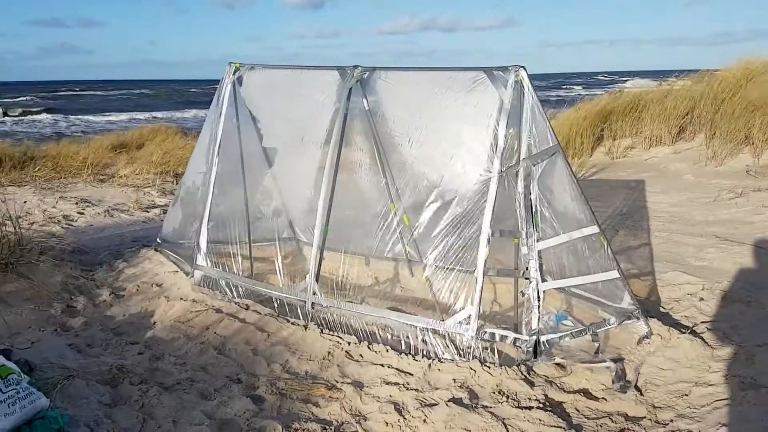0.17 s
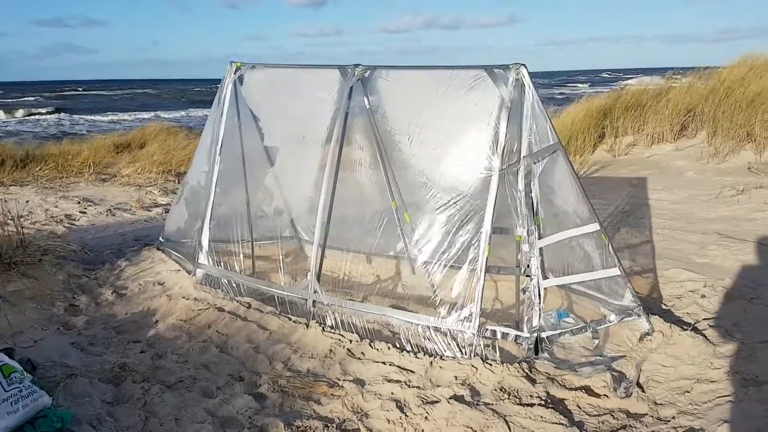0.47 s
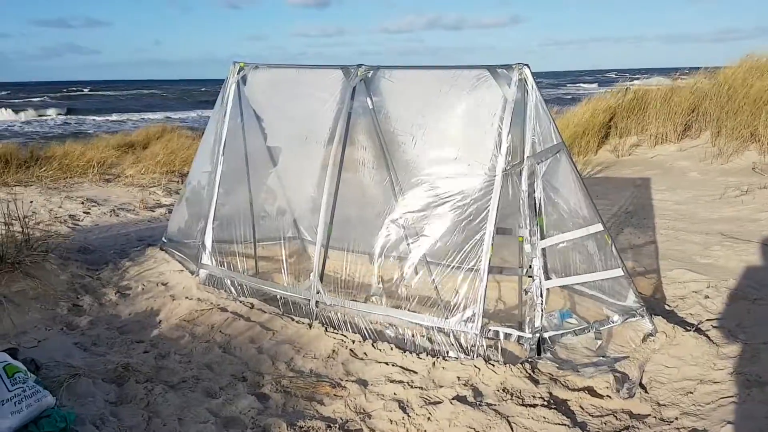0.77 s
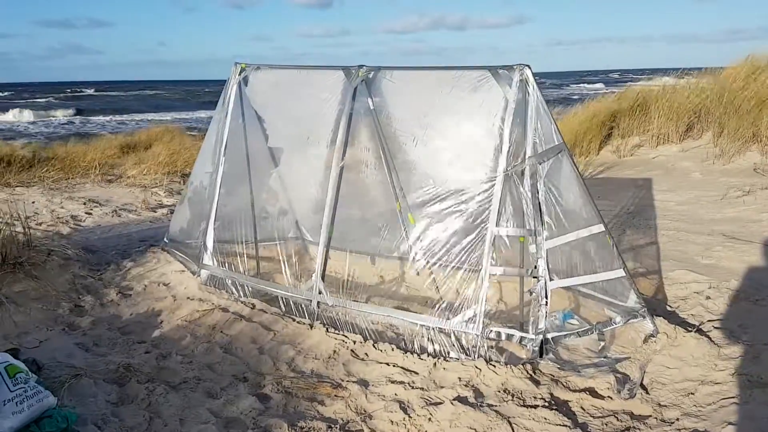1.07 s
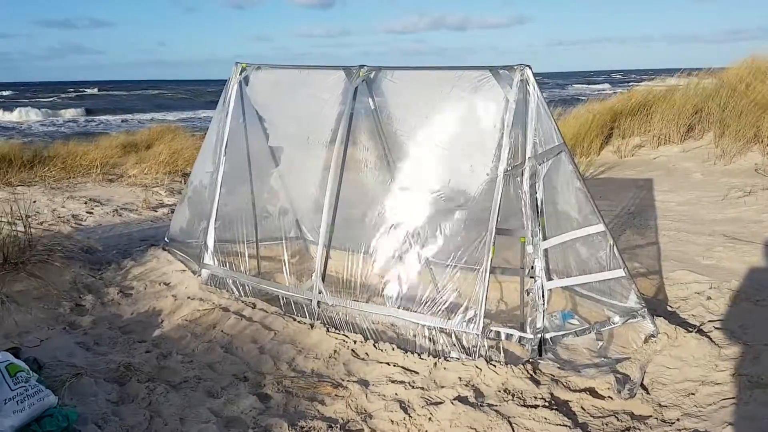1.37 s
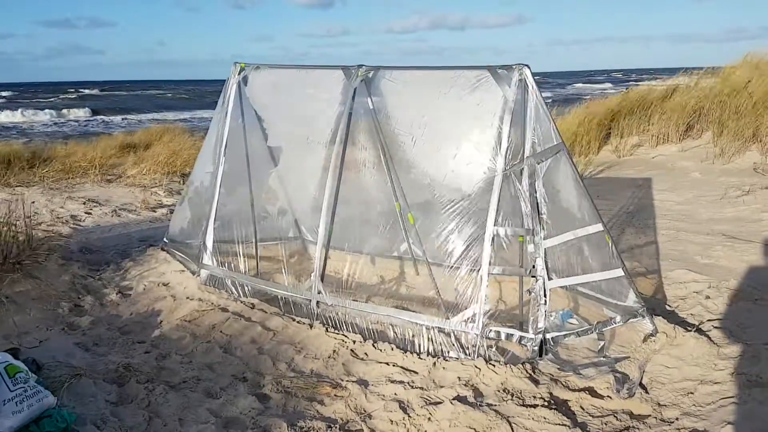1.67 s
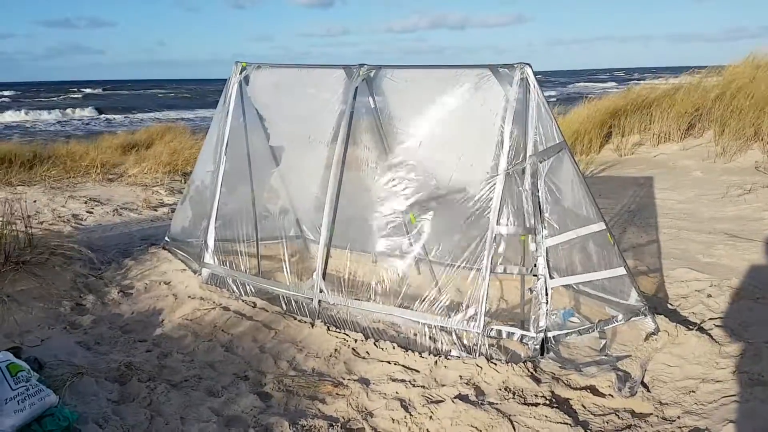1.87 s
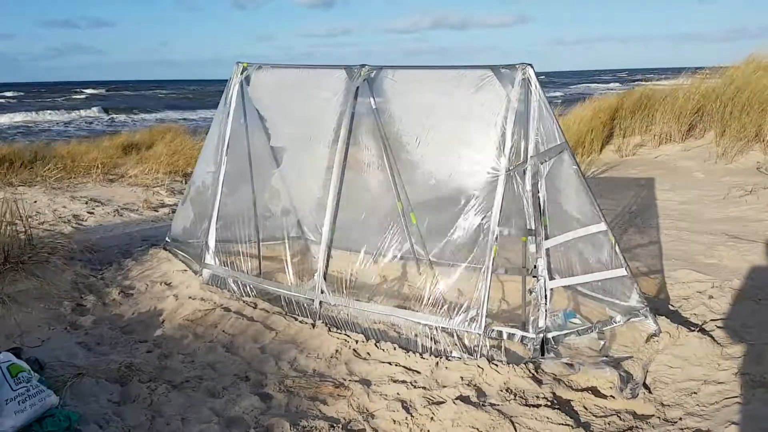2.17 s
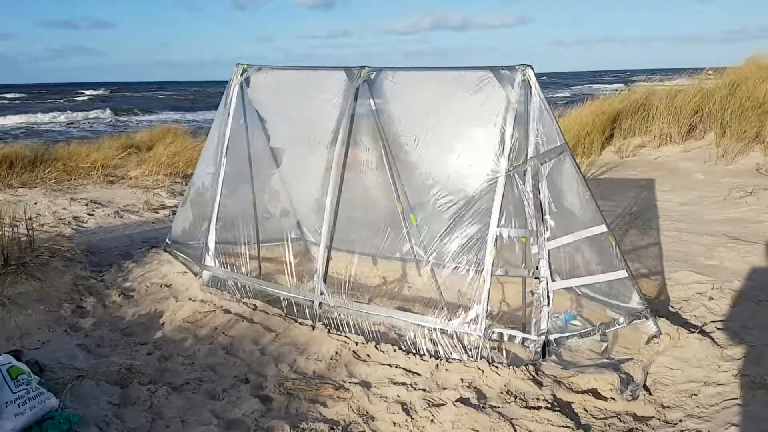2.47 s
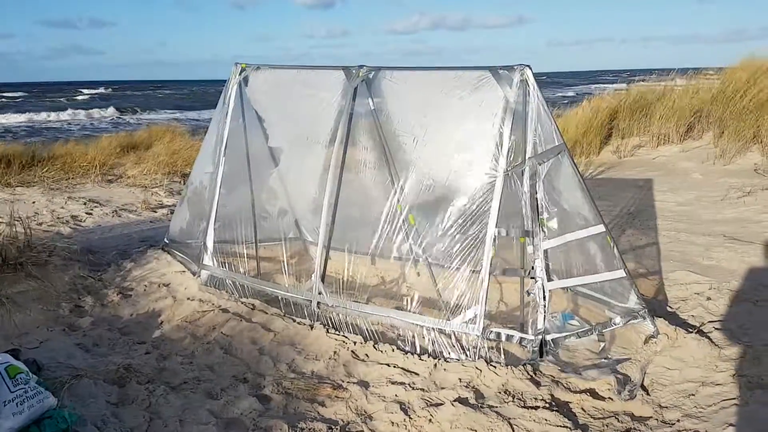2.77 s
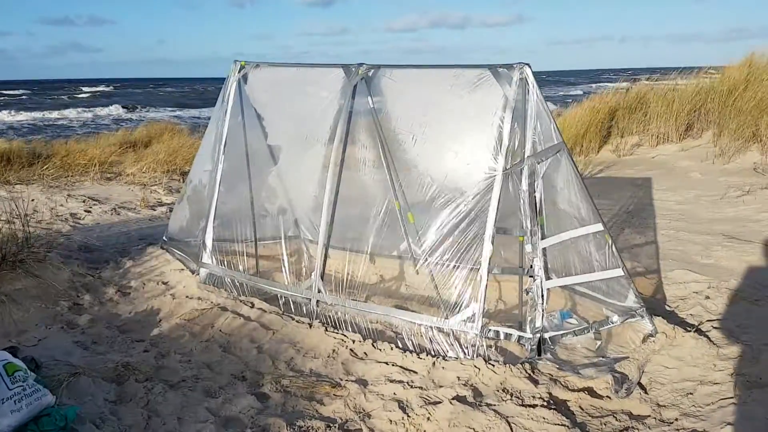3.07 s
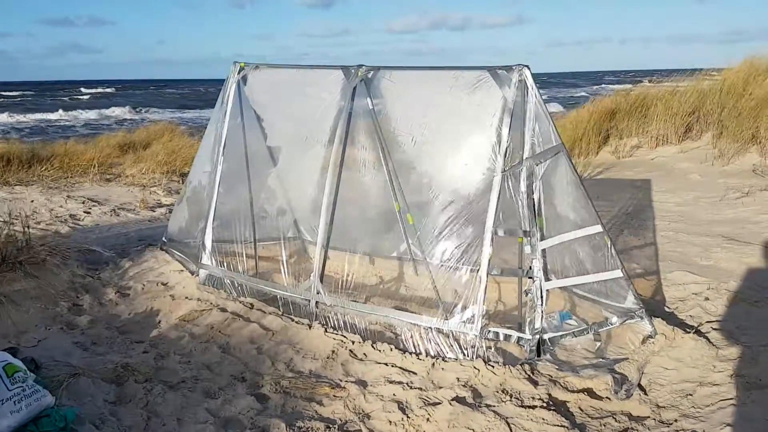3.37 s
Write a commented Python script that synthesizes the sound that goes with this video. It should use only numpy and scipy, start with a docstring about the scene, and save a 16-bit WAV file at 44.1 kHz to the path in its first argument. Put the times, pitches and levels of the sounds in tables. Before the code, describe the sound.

Plastic sheet snaps and crackles in gusty beach wind, with low buffeting and distant surf hiss

```python
"""Plastic sheet flapping on a windy beach

A plastic sheet on a frame snaps and crackles in the wind, with surf far off to the left.
Surf is shaped hiss that reaches the left port first; wind is filtered random impulses, separate at
the two microphone ports, with short noise bursts for hard buffets. The sheet's snaps are noise bursts
of milliseconds, and its crackle is noise gated by many random creases.
"""
import sys
import numpy as np
from scipy import signal
from scipy.fft import rfft, irfft
from scipy.io import wavfile
from scipy.ndimage import uniform_filter1d

SR = 44100
rng = np.random.default_rng(int(sys.argv[2]) if len(sys.argv) > 2 else 0)


def to_wav(s):
    """Save 16-bit WAV."""
    ch = np.atleast_2d(s).T  # columns
    pcm = np.round(np.clip(ch, -1, 1) * 32767)  # PCM
    wavfile.write(sys.argv[1], SR, pcm.astype(np.int16))


N = 154791  # length in samples

# Sound spectrum of the sheet. Each row: frequency in hertz, relative level in dB.
SHEET = [(200, -9), (600, 8.5), (1000, 5), (2000, 3.5), (3500, -4.5), (5800, -6.5), (7500, -14.5),
         (9000, -29.5), (12000, -26.5), (15500, -33.5)]
SHEET_PIVOT_HZ = 5200  # spectral tilts of the sheet turn about this frequency


def amp(db):
    """Decibel law: converts a level in dB to an amplitude ratio."""
    return 10 ** (np.asarray(db) / 20)


def evened(x):
    """Normalization: scales a signal to unit root-mean-square value."""
    return x / np.sqrt(np.mean(x ** 2) + 1e-20)


def read(points, hz):
    """Logarithmic frequency scale: interpolates a spectrum table along log frequency."""
    f, value = np.transpose(points)
    return np.interp(np.log(hz + 1), np.log(f + 1), value)


def curve(table, column):
    """Slow envelope: interpolates one column linearly in time, at every sample."""
    rows = np.array(table)
    return np.interp(np.arange(N) / SR, rows[:, 0], rows[:, column])


def colour(x, points, tilt_db=0., pivot_hz=SHEET_PIVOT_HZ):
    """Linear filtering by a spectrum table, tilted in dB per octave from an octave below the pivot upward."""
    hz = np.fft.rfftfreq(x.shape[-1], 1 / SR)
    octaves = np.log2(np.maximum(hz / pivot_hz, .5))
    gain = amp(read(points, hz) + tilt_db * octaves)
    return irfft(rfft(x) * gain, x.shape[-1])


def clicks(per_s, spread_db, channels=2):
    """Random point process: sparse impulses of random sign, a few of them large."""
    chance, size, sign = rng.random((3, channels, N))
    struck = chance < per_s / SR
    excess_db = spread_db * np.minimum(-np.log(size + 1e-9), 4)
    return struck * np.sign(sign - .5) * amp(excess_db)


def sides(pan_db):
    """Level difference between the ears: left and right gains, half the difference on each side."""
    return amp(np.array([pan_db / 2, -pan_db / 2]))


def bursts(rows, spectrum, pivot_hz, grain, skew, power, size):
    """Transient noise under a swelling envelope; rows of (s, dB, pan dB, length s, tilt dB per octave)."""
    vary_db = 3.5  # each burst shifts the points of its spectrum by chance
    out = np.zeros((2, N + size))
    t = np.arange(size) / SR
    noises = rng.standard_normal((len(rows), 2, size))
    for noise, (s, db, pan_db, length, tilt_db) in zip(noises, rows):
        own = [(hz, level + vary_db * chance)
               for (hz, level), chance in zip(spectrum, noise[0, ::-1])]
        # A skew under 1 gives a quick rise and a long tail
        phase = np.clip(t / max(length, 1e-3), 0, 1) ** skew
        swell = np.sin(np.pi * phase).clip(0) ** power
        spiky = noise * abs(noise) ** grain  # grain 0 leaves smooth noise
        burst = swell * colour(spiky, own, tilt_db, pivot_hz)
        # Each port gets the energy of unit noise under the same swell
        burst = burst / np.sqrt((burst ** 2).sum(1, keepdims=True) / (swell ** 2).sum())
        at = max(round(s * SR), 0)
        out[:, at:at + size] += amp(db) * sides(pan_db)[:, None] * burst
    return out[:, :N]


def surf():
    """Partial coherence and arrival delay: wide hiss in drifting patches, brighter as it swells."""
    # Each row: frequency in hertz, relative level in dB per hertz
    hiss_spectrum = [(200, -5), (500, -7), (750, 2), (1000, -4.5), (1550, -7), (1750, -4.5), (1950, -2.5),
                     (2350, -7), (3000, -9), (4300, -11.5), (5800, -20.5), (7100, -17), (8000, -24.5),
                     (9000, -38.5), (12000, -31), (15600, -35)]
    # Each row: time in seconds, level in dB before a final 3 dB lift
    level_points = [(0, -41.5), (.5, -41), (1.0, -41), (1.5, -40.5), (1.85, -40.5), (2.15, -38),
                    (2.45, -40), (2.8, -41), (3.1, -41.5), (3.51, -42)]
    # Each row: frequency in hertz, left minus right in dB
    balance_points = [(180, -12), (550, 3), (1650, -2), (4970, -7), (15000, -3)]
    # Each row: frequency in hertz, likeness of left and right from 0 to 1
    likeness_points = [(300, 0.11), (1000, 0.48), (2000, 0.74), (4000, 0.09), (8000, 0.2)]
    lead_s, patch_db = .00041, 1.37
    brighten = 0.27  # extra tilt, dB per octave for each dB of swell
    window, hop = 1024, 256  # samples
    frames, hz = N // hop + 5, np.fft.rfftfreq(window, 1 / SR)

    a, b, c, d, patches = rng.standard_normal((frames, len(hz), 5)).T
    # Smoothing over frequency, then over time, makes the patches
    patches = evened(uniform_filter1d(uniform_filter1d(patches, 14, 0), 12, 1))

    same = np.clip(read(likeness_points, hz), 0, 1)[:, None]
    left = a + 1j * b
    late = np.exp(-2j * np.pi * hz * lead_s)[:, None]
    right = same * late * left + np.sqrt(1 - same ** 2) * (c + 1j * d)
    spectra = np.array([left, right])
    spectra *= amp(read(hiss_spectrum, hz)[:, None] + patch_db * patches)
    spectra *= sides(read(balance_points, hz))[:, :, None]

    level_db = curve(level_points, column=1)
    frame_db = level_db[np.minimum(np.arange(frames) * hop, N - 1)]
    octaves = np.log2(hz / 2000 + .1)
    spectra *= amp(brighten * np.outer(octaves, frame_db - frame_db.mean()))
    hiss = signal.istft(spectra, nperseg=window, noverlap=window - hop)[1][:, :N]
    return amp(level_db) * evened(hiss) * np.sqrt(2)


def wind():
    """Turbulent pressure: eddies strike each port on their own, in lumps; sharp gusts favour small eddies."""
    # Each row: time in seconds, strength in dB before a final 3 dB lift, left minus right in dB,
    # sharpness in dB (extra level of the small eddies)
    gusts = [(0, -38, 11.5, 9.5), (.2, -30.5, 6.5, -6), (.35, -30.5, 2, -5), (.55, -28.5, -3, -0.5),
             (.75, -22.5, 5.5, -8.5), (.96, -37.5, 0.5, -3.5), (1.1, -31, 5, 3), (1.3, -30, 4.5, -3),
             (1.44, -32.5, 5.5, 2), (1.58, -30.5, 4.5, 1), (1.78, -22.5, 4.5, -5.5), (1.9, -40.5, 7.5, 5),
             (2.08, -35.5, -4.5, -1), (2.28, -31.5, 5, 4), (2.43, -39.5, 4, 4.5), (2.6, -33, -2, 2.5),
             (2.77, -30, 1, -1), (2.82, -34, -3.5, -5), (2.95, -22.5, -1.5, -11.5), (3.12, -33, 9, -5.5),
             (3.38, -30.5, 0, -2), (3.51, -42, 2, 3.5)]
    # Large eddies, then small ones. Each row: frequency in hertz, relative level in dB
    rumble = [(25, -24), (50, -4.5), (100, 2.5), (200, -2.5), (300, -5), (500, -52.5)]
    flutter = [(60, -2), (150, -4.5), (280, -5.5), (370, -1), (480, -8), (800, -16), (1500, -22.5),
               (4000, -75)]
    rumble_db, flutter_db = -4.5, -3.4
    eddies_per_s, spread_db = 1400, 1.5
    lump_db, lump_s = 2.46, 0.01

    width = round(lump_s * SR)
    drift = rng.standard_normal((2, N))
    lumps = evened(uniform_filter1d(uniform_filter1d(drift, width), width))
    lump_gain = amp(lump_db * lumps)
    big = evened(colour(clicks(eddies_per_s, spread_db) * lump_gain, rumble))
    small = evened(colour(clicks(eddies_per_s, spread_db) * lump_gain, flutter))
    mix = amp(rumble_db) * big + amp(flutter_db + curve(gusts, column=3)) * small
    strength = np.sqrt(2) * amp(curve(gusts, column=1))
    return strength * sides(curve(gusts, column=2)) * mix


def puffs():
    """Incoherent pressure bursts: hard buffets of air, unrelated between ports, strike fast and roll away."""
    # Each row: start in seconds, peak level in dB, left minus right in dB, length in seconds,
    # tilt in dB per octave
    buffets = [(.008, -35, 15.5, 0.047, 2.5), (.146, -24.5, 4.5, 0.042, -2.5), (.205, -21, 2, 0.077, -16.5),
               (.455, -22.5, 4, 0.066, -12.5), (.638, -15, 9.5, 0.031, -3.5), (.662, -20, -5, 0.071, -6),
               (.722, -27, -1, 0.13, -8.5), (1.13, -27.5, 7, 0.12, 0.5), (1.217, -26.5, 7.5, .02, 5),
               (1.235, -30.5, 4, 0.063, 1), (1.278, -22.5, 2, .03, -3.5), (1.341, -38, 13, .012, 3),
               (1.485, -17, 2, 0.067, -8), (1.55, -27, 5, 0.04, -8), (1.595, -23, 0, 0.11, -18.5),
               (1.68, -26, 2.5, 0.075, -5.5), (1.775, -30.5, 1, 0.05, -14), (2.27, -33.5, 2, 0.095, -4.5),
               (2.46, -25, 10, 0.0039, -2), (2.495, -23.5, 2.5, 0.078, -12.5),
               (2.565, -23.5, -0.5, 0.065, -9), (2.612, -19.5, -1, 0.046, -10.5),
               (2.646, -15, -1, 0.024, -8.5), (2.668, -20.5, 1, 0.046, -8.5),
               (2.71, -23.5, 4.5, 0.087, -11.5), (2.743, -15, -3, 0.021, -12.5),
               (2.938, -22.5, 6.5, 0.084, -3), (2.968, -17.5, -0.5, 0.05, -0.5),
               (3.022, -15, -4, 0.045, -6.5), (3.065, -27, 3, 0.076, -5), (3.135, -29.5, 4, 0.055, -3),
               (3.18, -20.5, 0, 0.055, -6.5), (3.245, -26.5, 2, 0.038, -5), (3.385, -24.5, 6, 0.06, -8.5)]
    # Each row: frequency in hertz, relative level in dB
    buffet_spectrum = [(30, -24), (70, -11), (130, -6.5), (250, -3), (370, 5), (550, -1), (1000, -10),
                       (2000, -18.5), (4000, -42), (8000, -62)]
    return bursts(buffets, buffet_spectrum, pivot_hz=366, grain=.55, skew=.6, power=.9, size=8192)


def crackle():
    """Superposed random impulses: many small creases, dull and bright, fold and let go in the sheet."""
    # Each row: time in seconds, rustle level in dB
    rustle = [(0, -40), (.18, -44), (.3, -43), (.45, -49), (.6, -35), (.75, -43), (.95, -40), (1.2, -47),
              (1.33, -65), (1.45, -29), (1.54, -55), (1.72, -38.5), (1.85, -58), (2.0, -42), (2.15, -47),
              (2.28, -42), (2.45, -47), (2.62, -50), (2.78, -47), (2.97, -37), (3.15, -64), (3.51, -42)]
    creases_per_s, spread_db, pan_db = 370, 3.5, -1.5
    crease_s = 0.00083  # time constant of the rise and of the fall
    tilts_db = (-3.5, 3)  # per octave: dull and bright creases

    t = np.arange(-400, 400) / SR
    crease = np.exp(-abs(t) / crease_s)[None]
    # One train of creases for each tilt
    trains = abs(clicks(creases_per_s, spread_db, channels=len(tilts_db)))
    folds = signal.oaconvolve(trains, crease, "same")
    noise = np.zeros((2, N))
    for fold, tilt_db in zip(folds, tilts_db):
        noise += evened(colour(fold * rng.standard_normal((2, N)), SHEET, tilt_db))
    return amp(curve(rustle, column=1)) * sides(pan_db)[:, None] * evened(noise)


def snaps():
    """Impulsive radiation: each snap is milliseconds of noise in the colour of the sheet."""
    # Each row: start in seconds, peak level in dB, tilt in dB per octave, length in seconds
    snap_rows = [(0.246, -43, 22, 0.0045), (0.36, -36, 10, 0.0035), (0.373, -33.5, 7, 0.008),
                 (0.425, -31, 3, 0.0046), (0.4615, -30.5, 9.5, 0.012), (0.477, -37, 13, 0.006),
                 (0.489, -32.5, 10, 0.0042), (0.5, -33, 8, 0.012), (0.511, -36, 7, 0.0096),
                 (0.5417, -24.5, -2, 0.0042), (0.5484, -23, 4, 0.0034), (0.602, -34.5, 4, 0.0065),
                 (0.612, -28, 7, 0.0027), (0.629, -37, -30, 0.0045), (0.6878, -22, 6, 0.0053),
                 (0.8836, -26, -0.5, 0.0041), (1.211, -25, 4, 0.0025), (1.255, -31, 9, 0.0032),
                 (1.372, -27, 6, 0.0037), (1.43, -37, 3, 0.011), (1.438, -25, 2, 0.006),
                 (1.442, -25.5, 7, 0.01), (1.4481, -22.5, 2, 0.0086), (1.458, -24.5, 3.5, 0.009),
                 (1.469, -23, 2, 0.0061), (1.489, -27, 3, 0.0043), (1.537, -22, -4, 0.0015),
                 (1.6841, -29, 1, 0.0056), (2.549, -28.5, 6, 0.0047), (2.591, -29.5, 6, 0.0043),
                 (2.633, -26, 6, 0.0032), (2.824, -35, 8, 0.0057), (2.846, -32, 7, 0.0063),
                 (2.854, -32, 5, 0.0079), (2.868, -27.5, 5.5, 0.0065), (2.9414, -41, 11, 0.0083),
                 (2.963, -24, 0, 0.0036), (3.243, -32.5, 5, 0.0049)]
    pan_db = -2.5  # left minus right
    rows = [(s, db, pan_db, length, tilt_db) for s, db, tilt_db, length in snap_rows]
    return bursts(rows, SHEET, SHEET_PIVOT_HZ, grain=0.42, skew=0.65, power=2.7, size=2048)


def scene():
    """Superposition: the sound pressures of all sources add."""
    return surf() + wind() + puffs() + crackle() + snaps()


def record(dry):
    """Band limiting and saturation: deep bass is dropped, hard buffets are rounded off, then the top is cut."""
    low_cut_hz, edge_hz, ceiling = 40, 15780, .8
    high_pass = signal.butter(2, low_cut_hz, "high", fs=SR, output="sos")
    thinned = signal.sosfilt(high_pass, dry)
    soft = ceiling * np.tanh(thinned / ceiling)
    low_pass = signal.firwin(1023, edge_hz, window=("kaiser", 9), fs=SR)
    return signal.oaconvolve(soft, low_pass[None], "same")


dry = scene()
out = record(dry)
to_wav(out)
```